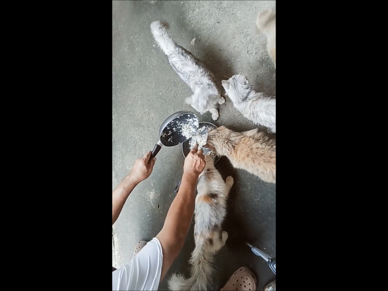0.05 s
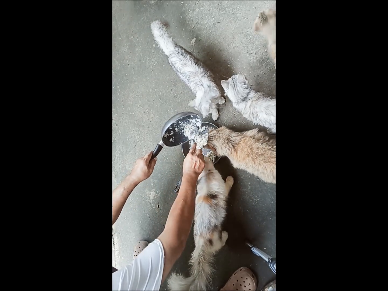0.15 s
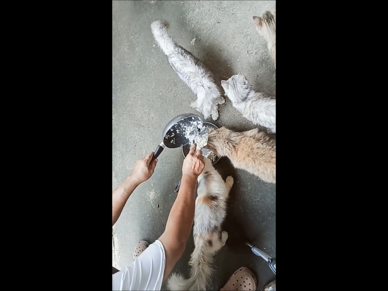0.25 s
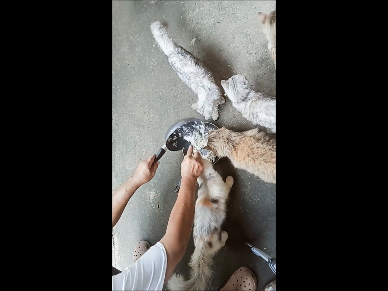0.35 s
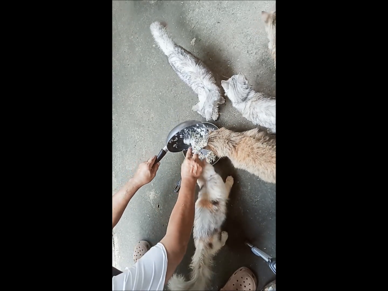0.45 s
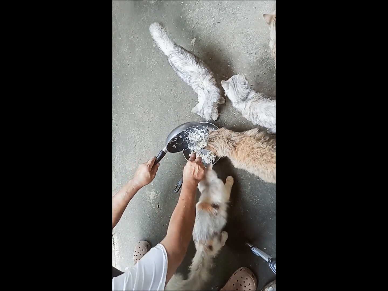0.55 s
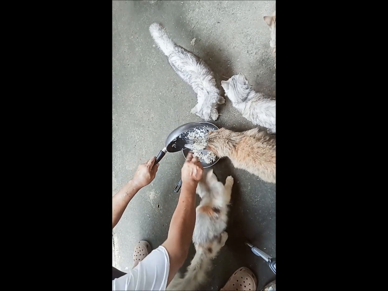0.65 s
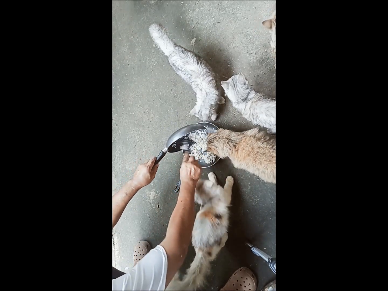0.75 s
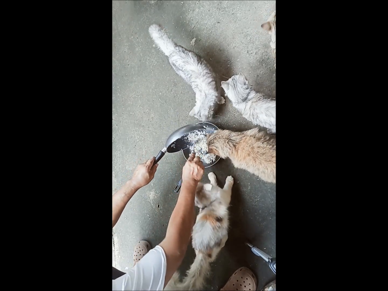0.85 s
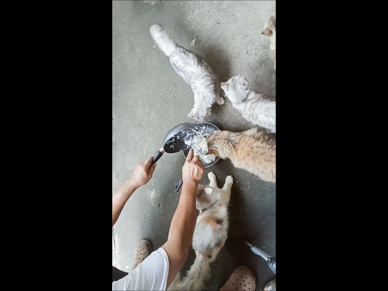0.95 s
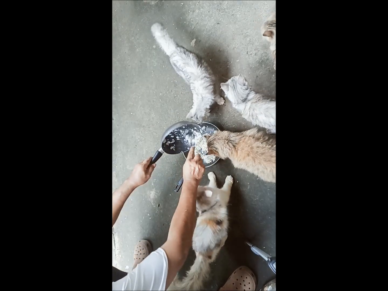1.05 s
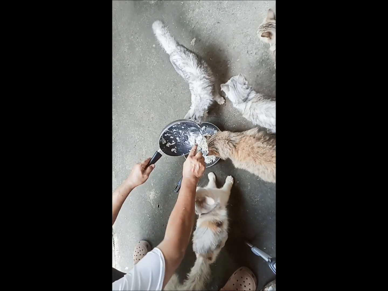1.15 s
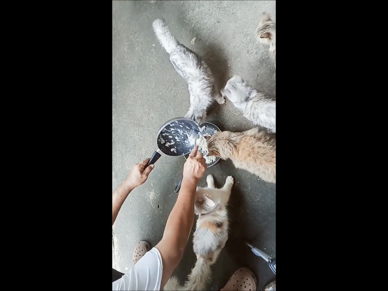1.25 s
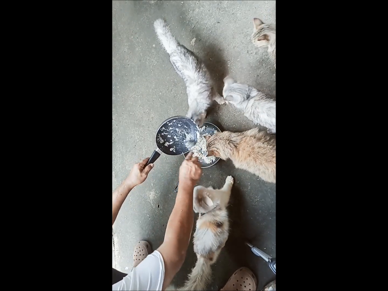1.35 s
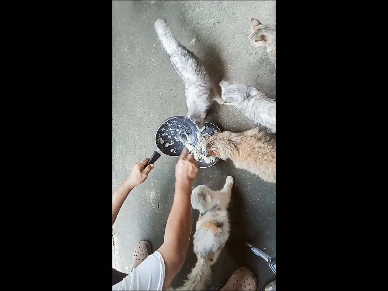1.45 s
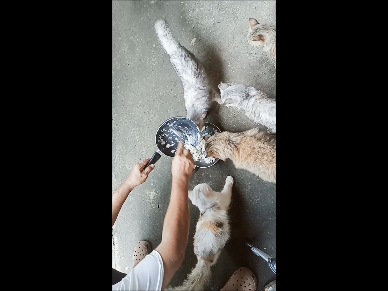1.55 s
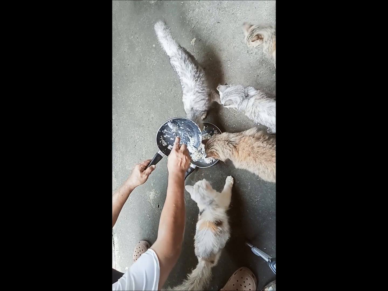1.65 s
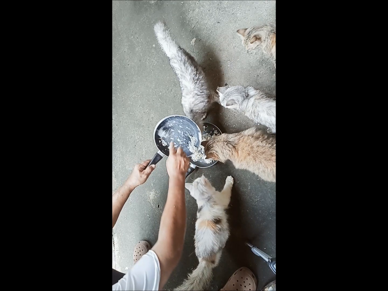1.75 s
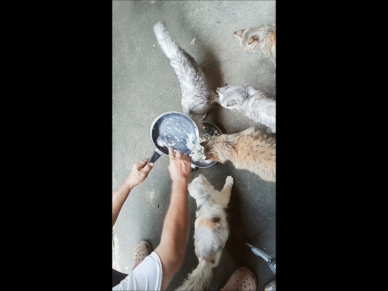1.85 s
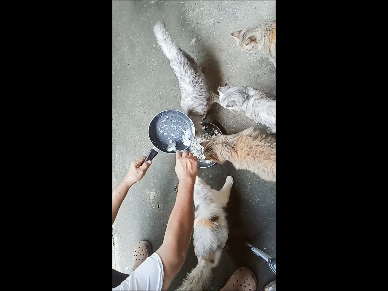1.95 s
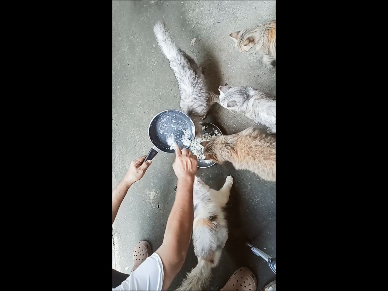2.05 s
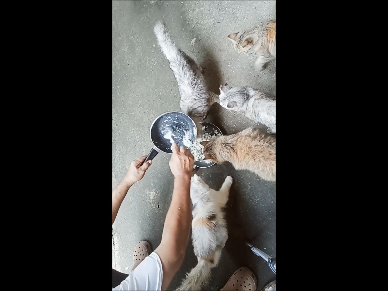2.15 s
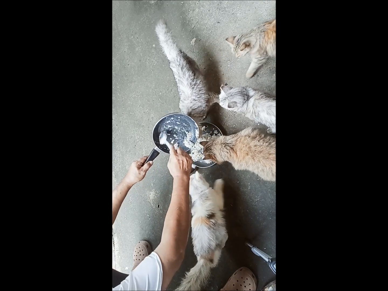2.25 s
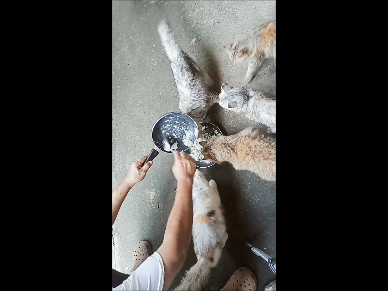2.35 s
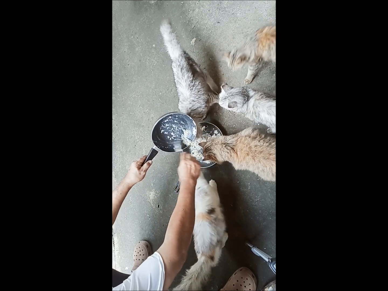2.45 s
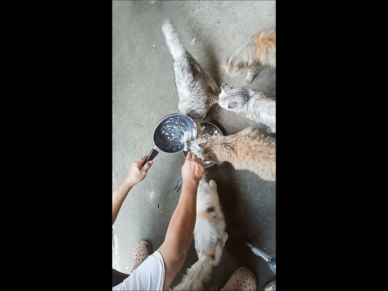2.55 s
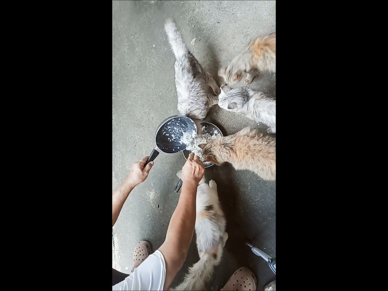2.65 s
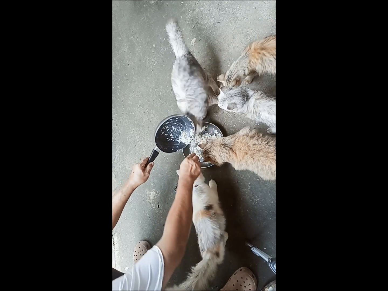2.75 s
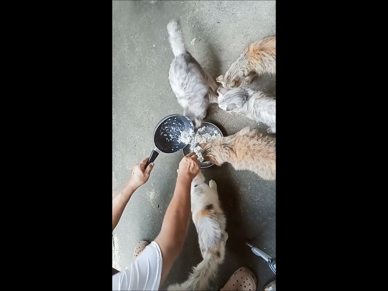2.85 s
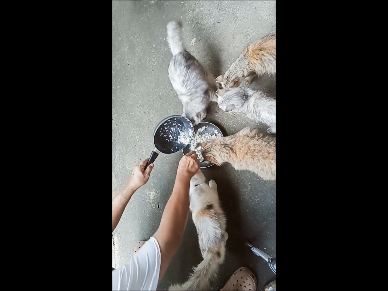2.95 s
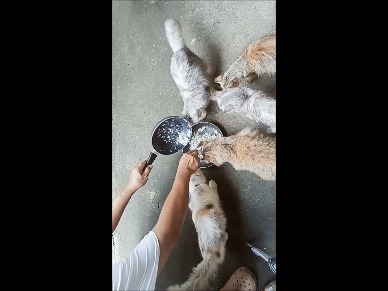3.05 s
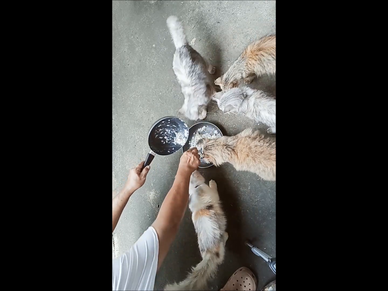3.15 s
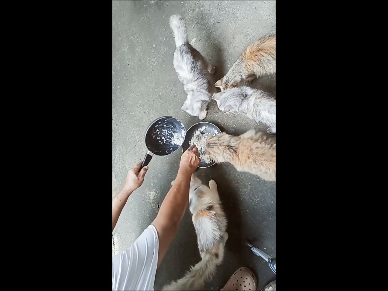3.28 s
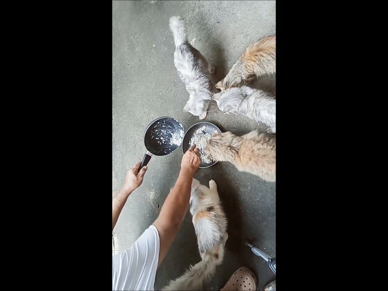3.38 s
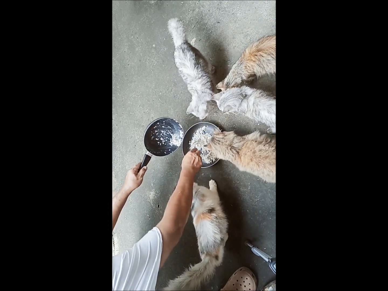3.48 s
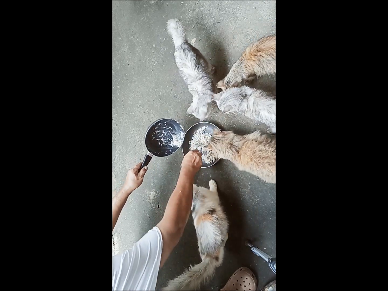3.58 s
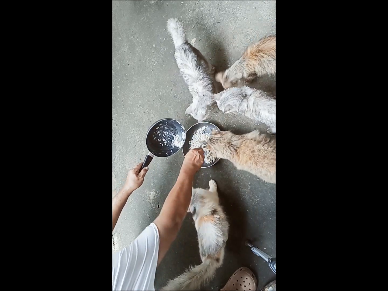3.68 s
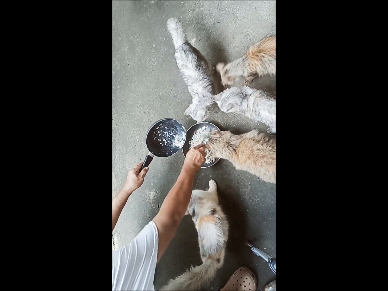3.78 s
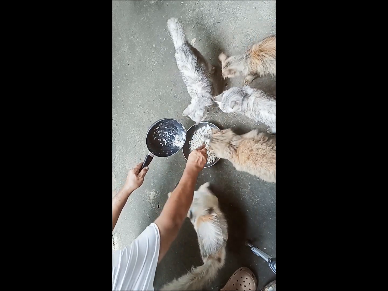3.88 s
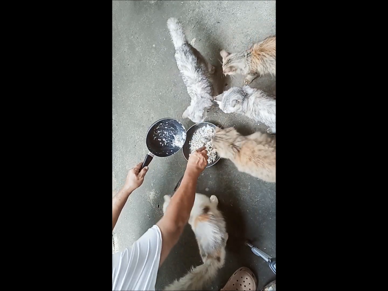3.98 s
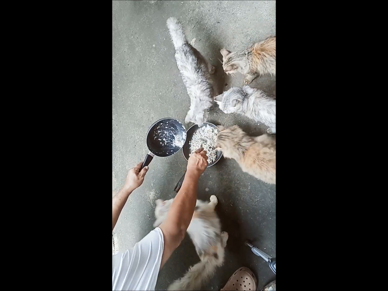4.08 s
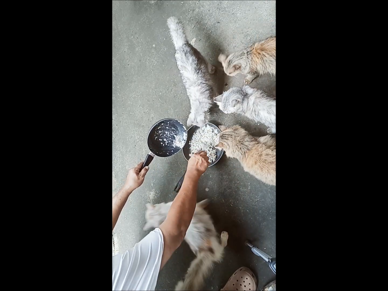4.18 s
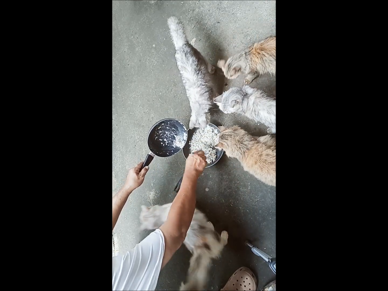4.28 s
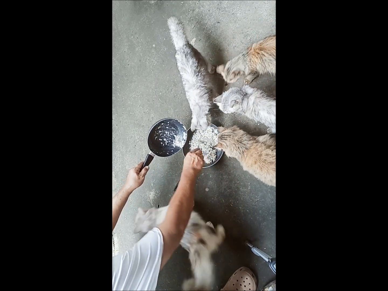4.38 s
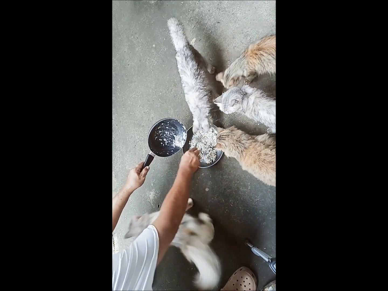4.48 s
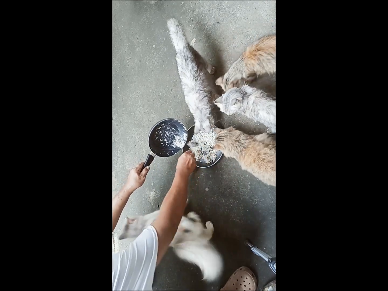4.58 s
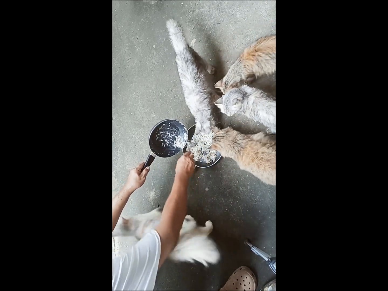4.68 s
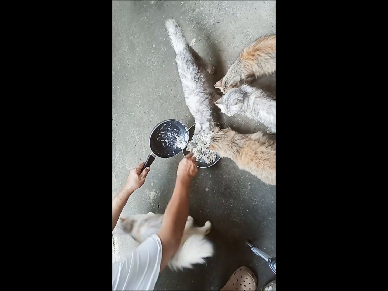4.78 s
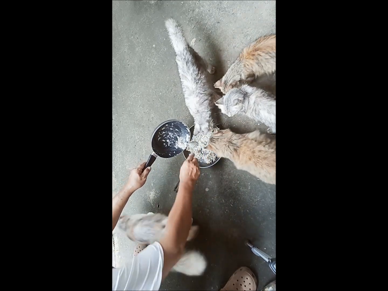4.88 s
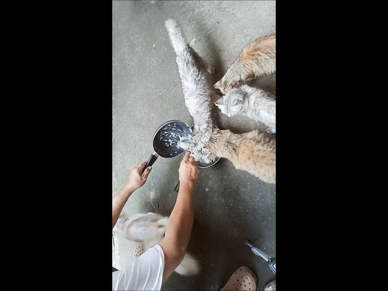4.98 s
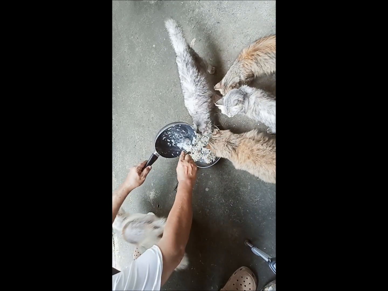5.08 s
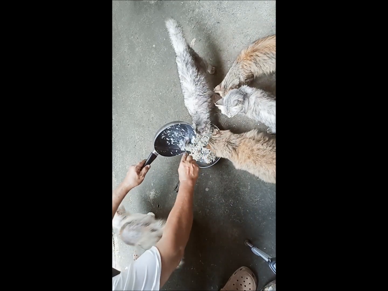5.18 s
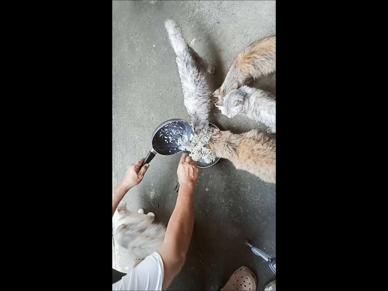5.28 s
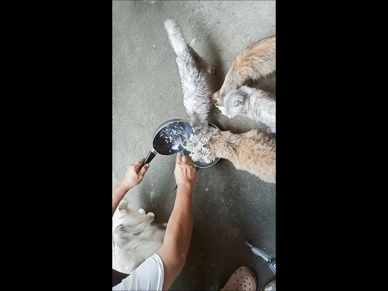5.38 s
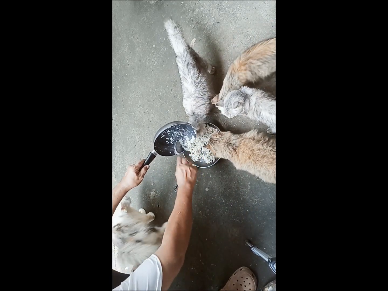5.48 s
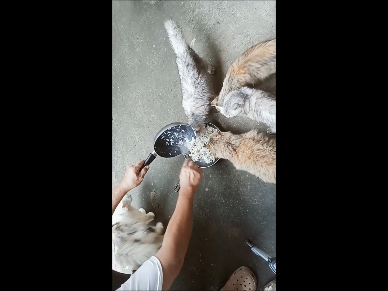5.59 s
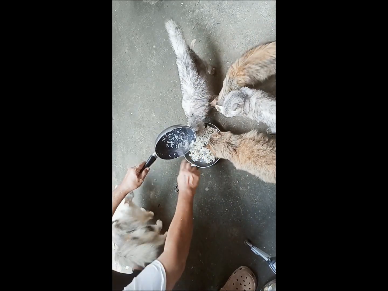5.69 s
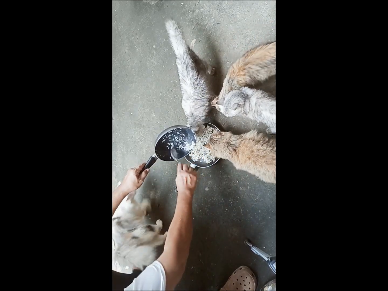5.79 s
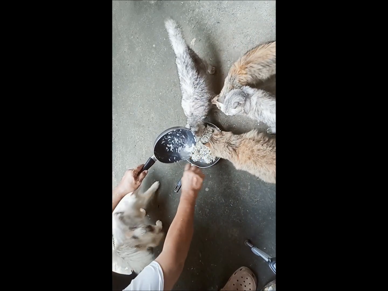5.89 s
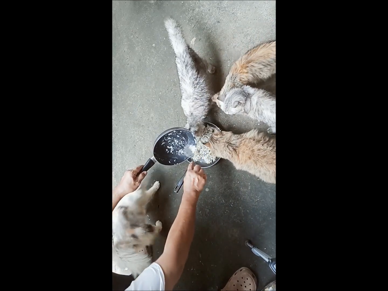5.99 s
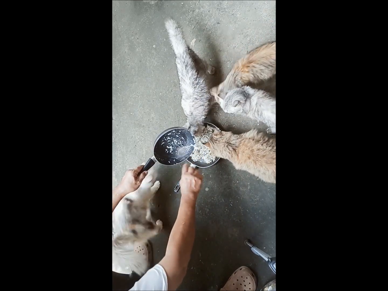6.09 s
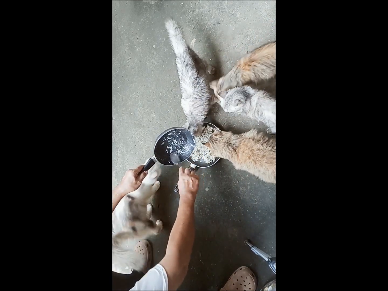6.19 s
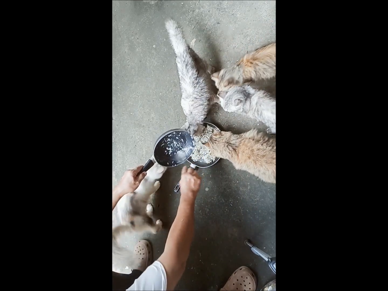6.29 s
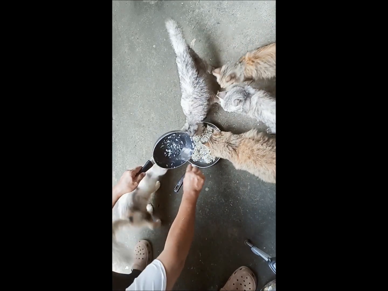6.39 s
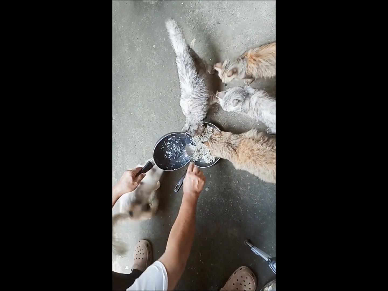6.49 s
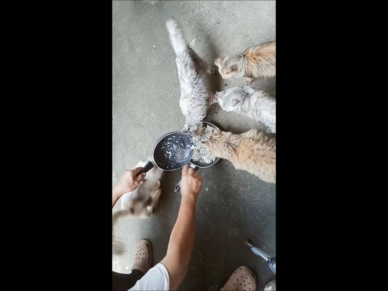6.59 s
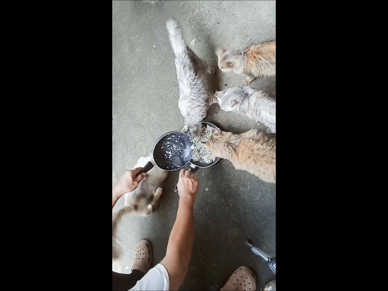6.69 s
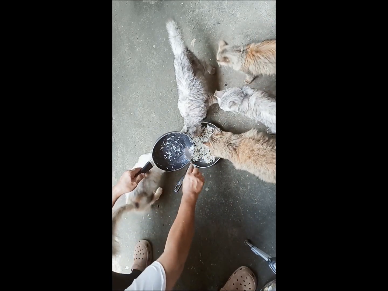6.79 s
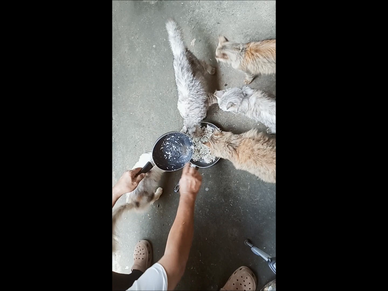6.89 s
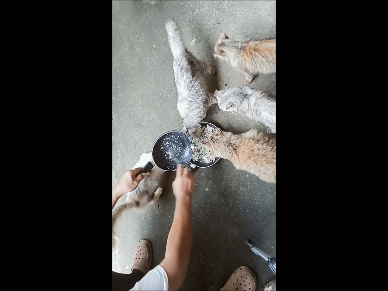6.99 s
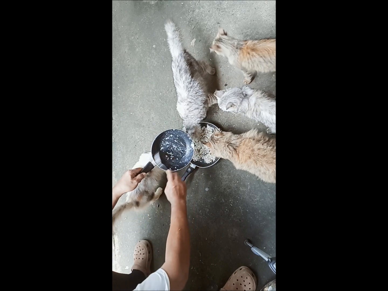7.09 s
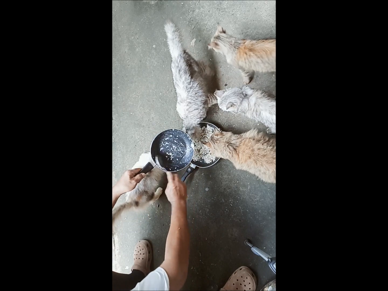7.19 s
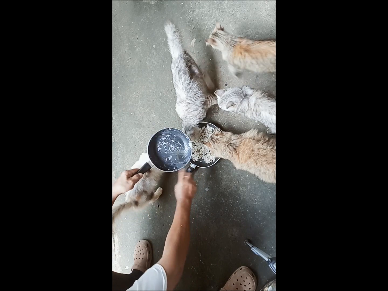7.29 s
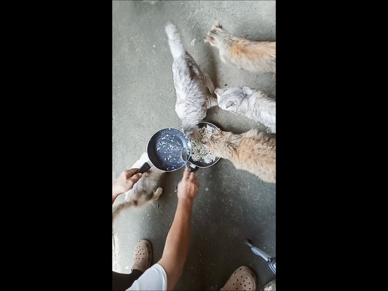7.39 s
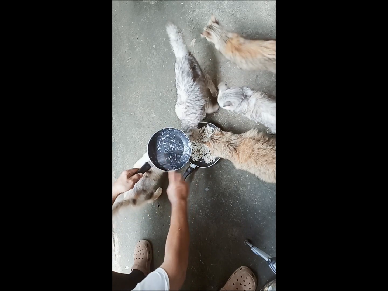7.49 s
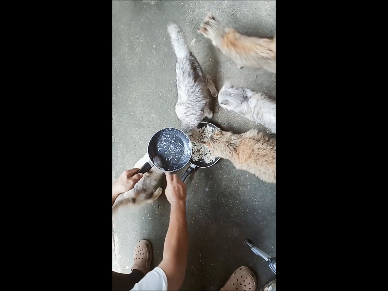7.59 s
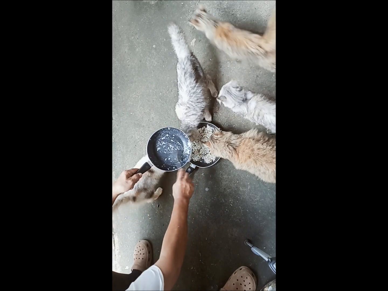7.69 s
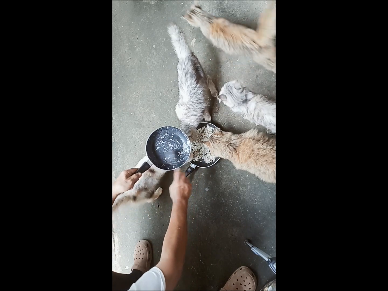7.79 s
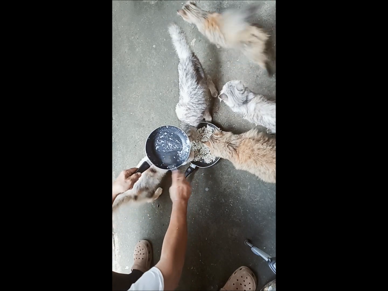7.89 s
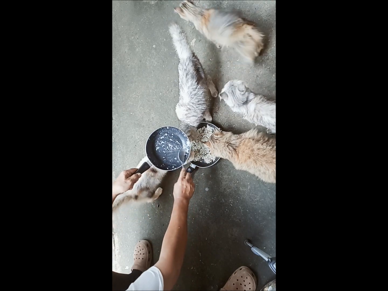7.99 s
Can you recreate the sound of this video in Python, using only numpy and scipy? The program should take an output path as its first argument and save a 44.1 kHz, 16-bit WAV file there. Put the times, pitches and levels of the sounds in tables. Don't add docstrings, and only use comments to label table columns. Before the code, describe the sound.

Close outdoors on concrete, a metal spoon knocks and scrapes a frying pan held over a metal dish. Dull, food-damped clanks come in the first two and a half seconds, with hissing, squeaky drags. Then a quiet gap with faint traffic rumble, distant engine and tiny ticks. From just before five seconds the blows return, harder and closer together, ending on the loudest clank.

```python
import sys
import numpy as np
from scipy import signal
from scipy.fft import rfft, irfft, next_fast_len
from scipy.io import wavfile
from scipy.ndimage import uniform_filter1d

SR = 44100
rng = np.random.default_rng(int(sys.argv[2]) if len(sys.argv) > 2 else 0)


def file_out(sig):
    cols = np.atleast_2d(sig).T
    lim = np.clip(cols, -1, 1)
    pcm = np.round(lim * 32767).astype(np.int16)
    wavfile.write(sys.argv[1], SR, pcm)


def invert_db(level):
    return 10 ** (np.asarray(level, dtype=float) / 20)


N = 354563

# pitch in Hz, level in dB, time to fade by 60 dB in seconds.
PAN_TONES = [(566.6, -6, 0.21), (600.5, -3, 0.36), (636, -15, 0.062), (975, -34, 0.48), (1120.8, 0.5, 0.35),
             (1141, -9, 0.072), (1446, 9.5, 0.059), (1790, -5.5, 0.26), (1818, 1.5, 0.23),
             (1996, -9.5, 0.33), (2093, -1, 0.14), (2188, -4, 0.26), (2470, -9, 0.15), (2630, 2.5, 0.17),
             (2696, 3, 0.13), (3083, -7.5, 0.34), (3115, 2.5, 0.14), (3380, -8.5, 0.23), (3657, -1.5, 0.13),
             (4010, -21, 0.043), (4136, -5, 0.086), (4480, -15.5, 0.095), (4693, -15, 0.16),
             (5482, -21, 0.11), (6050, -19.5, 0.084), (6570, -28.5, 0.13), (6920, -43.5, 0.039),
             (8320, -27, 0.14), (8500, -17.5, 0.065)]
# frequency in Hz, level in dB.
GRIT_COLOUR = [(88, -93), (150, -11), (424, -4.5), (723, 2), (958, -4), (1350, -1.5), (1610, -22.5),
               (1790, -2), (3750, -10.5), (5200, -46), (6760, -48), (11400, -120)]
# frequency in Hz, level in dB.
FIZZ_COLOUR = [(2650, -35), (4500, -4.5), (4740, -7.5), (5070, -17.5), (5370, -15), (6930, -12.5),
               (7450, -8.5), (10300, -27.5), (15600, -30.5)]
BOWL_REST_HZ = 592


def read(points, hz):
    f, value = np.transpose(points)
    return np.interp(np.log(hz + 1), np.log(f + 1), value)


def evened(x):
    return x / np.sqrt(np.mean(x ** 2) + 1e-20)


def add(mix, s, sound):
    part = mix[max(round(s * SR), 0):][:len(sound)]
    part += sound[:len(part)]


def colour(x, points, lo_hz=0, hi_hz=30000, lumps_db=0):
    size = next_fast_len(len(x), True)
    hz = np.fft.rfftfreq(size, 1 / SR) + 1
    edges = 1 / np.sqrt((1 + (lo_hz / hz) ** 6) * (1 + (hz / hi_hz) ** 6))
    lumps = np.interp(hz, np.linspace(0, SR / 2, num=180), rng.standard_normal(size=180))
    gain = invert_db(read(points, hz) + lumps_db * lumps) * edges
    return evened(irfft(rfft(x, size) * gain, size)[:len(x)])


def resonate(x, hz, width):
    turn = np.exp(2j * np.pi * np.cumsum(hz * np.ones(len(x))) / SR)
    r = np.exp(-np.pi * width / SR)
    smooth = signal.lfilter([(1 - r) ** 2], [1, -2 * r, r * r], x / turn)
    return 2 * (turn * smooth).real


def modes(t, hz, db, t60, phase):
    level = invert_db(db[:, None] - 60 * t / t60[:, None])
    return (level * np.sin(2 * np.pi * (hz[:, None] * t + phase[:, None]))).sum(0)


def landing(blow_db, bowl_hz, rim_hz, bright_db, wall_hz, bowl_db, wall_db, over_db, ring_left):
    family_hz = [620, 1150, 1950, 2850, 7000]
    family_lean = [-1.55, -0.5, 0.65, 1.36]
    rim_db, edge_db = -13, -15
    t = np.arange(SR // 4) / SR
    hz, db, t60 = np.transpose(PAN_TONES)
    chance = rng.random((3, len(PAN_TONES)))
    noise = rng.standard_normal((2, len(t)))

    tick_db = blow_db - 18.5 + 0.89 * bright_db
    family_db = blow_db + np.array([bowl_db, wall_db, rim_db, edge_db]) + bright_db * np.array(family_lean)
    family_db = np.append(family_db, tick_db + 17.5)

    spot_db = 9.9 * (chance[0] - 0.5)
    ring_db = read(np.transpose([family_hz, family_db]), hz) + db + spot_db - 14.5 - over_db / 2
    ring = modes(t, hz, ring_db, t60 * np.clip(ring_left, 0.2, 3), chance[1])
    ring *= np.clip((t[-1] - t) / 0.089, 0, 1)

    moved_wall_hz = wall_hz + 0.4 * (bowl_hz - BOWL_REST_HZ)
    clank_hz = np.array([bowl_hz, moved_wall_hz, rim_hz, 1.39 * rim_hz])
    clank_t60 = np.array([0.054, 0.067, 0.054, 0.046])
    clank = modes(t, clank_hz, family_db[:4] + 0.5 + over_db / 2, clank_t60, 0.014 + 0.2 * chance[2, :4])

    crack_fade = invert_db(-60 * t / 0.14) + 3.9 * invert_db(-60 * t / 0.0095)
    crack = colour(noise[0], GRIT_COLOUR, lumps_db=5.0) * invert_db(blow_db - 17.0) * crack_fade

    patch = [(hz, db + 12 * c) for (hz, db), c in zip(FIZZ_COLOUR, chance[2, 4:])]
    tick_fade = 1.1 * invert_db(-60 * t / 0.016) + 0.34 * invert_db(-60 * t / 0.14)
    tick = colour(noise[1], patch, lumps_db=3) * invert_db(tick_db - 6.5) * tick_fade

    low_cut = signal.butter(2, 354, "high", fs=SR)
    metal = signal.lfilter(*low_cut, (ring + clank + crack) * (1 - np.exp(-t / 0.0011)))
    return metal + tick * (1 - np.exp(-t / 0.001))


def knocks(pan):
    # start in seconds, blow in dB, bowl pitch in Hz, rim pitch in Hz,
    # brightness in dB. First, landings flat into the bowl.
    clanks = [
        (0.51, -8.5, 723, 1980, -2),
        (5.182, -2.5, 650, 2160, -0.5),
        (5.549, -2.5, 659, 1957, 1),
    ]
    side_knocks = [
        (0.037, -28, 764, 2350, 2.5),
        (0.854, -5.5, 602, 2004, 3),
        (1.749, -20.5, 634, 2040, 5.5),
        (4.761, -11, 593, 2147, 4.5),
        (6.002, -12, 710, 2075, 4.5),
    ]
    rim_knocks = [
        (1.309, -5, 560, 1795, 1),
        (5.925, -5, 563, 2270, 4),
        (6.319, -7, 722, 1924, 1.5),
        (6.781, -2, 704, 1990, -0.5),
        (7.241, -2, 536, 2178, 7),
        (7.958, 0.5, 626, 2230, 0),
    ]
    glances = [
        (0.1, -29.5, 680, 1750, 5),
        (0.624, -5.5, 562, 1754, 0),
        (0.789, -32.5, 630, 1770, -2.5),
        (1.832, -33, 566, 1830, -1),
        (2.378, -2.5, 676, 1823, -0.5),
        (5.258, -10, 582, 2100, -6.5),
        (7.697, -6.5, 558, 2130, 2.5),
    ]
    bounces = [
        (5.597, -7.5, 592, 2140, -1),
        (6.836, -7.5, 575, 2060, -3),
        (7.304, -4.5, 605, 2120, 0),
        (7.43, 0.5, 559, 2146, -2),
    ]
    muffled = [
        (0.198, -11, 827, 2065, 1.5),
        (6.378, -20, 570, 2185, 2),
    ]
    peals = [
        (1.327, 0, 560, 1824, -1.5),
        (1.861, -11.5, 560, 1770, -4),
    ]
    # wall pitch in Hz, bowl level in dB, wall level in dB,
    # clank over ring in dB, share of the ring time that the food leaves.
    kinds = [
        (1271, -8, -12.5, 10.5, 1),
        (1449, -9, -12, 0, 0.66),
        (1138, -9.5, -12.5, 2.5, 1.01),
        (1129, -10, -9.5, -5, 0.72),
        (1162, -8, -21.5, -3.5, 0.81),
        (1020, -12.5, -21, 13, 0.99),
        (1140, -12, -12.5, -5, 0.94),
    ]
    for table, kind in zip((clanks, side_knocks, rim_knocks, glances, bounces, muffled, peals), kinds):
        for s, *blow in table:
            add(pan, s - 0.0006, landing(*blow, *kind))


def drag(rows, bowl_db, rise_hz=15, from_hz=2160, to_hz=2160, squeal_db=-30, sing_hz=4100, sing_db=-30):
    ring_shares = [0.64, 0.38, 0.13]
    s, press_db, speed = np.transpose(rows)
    fizz_db = -24.5 + 22 * speed
    t = np.arange(s[0], s[-1] + 0.25, 1 / SR)
    speed_now = np.interp(t, s, speed)
    fade = np.clip((t - s[0]) / 0.0045, 0, 1) * np.clip((s[-1] - t) / 0.012, 0, 1)
    press, bowl, fizz = (fade * invert_db(np.interp(t, s, press_db + db)) for db in (0, bowl_db, fizz_db))

    sizes = invert_db(2.44 * np.minimum(rng.exponential(1, len(t)), 5)) * rng.choice([-1, 1], len(t))
    slips = evened(sizes * (rng.random(len(t)) < 4000 / SR)) + 0.56 * rng.standard_normal(len(t))
    contact_db = 1.47 * evened(uniform_filter1d(rng.standard_normal(len(t)), 300))
    slips = evened(slips * invert_db(contact_db))

    out = 0.43 * press * colour(slips, GRIT_COLOUR, lo_hz=377, lumps_db=2.0)
    out += 0.58 * fizz * colour(slips, FIZZ_COLOUR, hi_hz=11800, lumps_db=5.0)

    hz, db, t60 = np.transpose(PAN_TONES)
    spot, phase = rng.random((2, len(PAN_TONES)))
    db = db + 8 * spot + 3.8 * np.log2(hz / 2400).clip(-2, 0) + 4 * np.log2(t60 / 0.15)
    parts = slice(3, 21), slice(21, 25), slice(25, None)
    for part, drive, share in zip(parts, (press, fizz, fizz), ring_shares):
        ring = modes(t[:SR // 6] - s[0], hz[part], db[part], 0.4 * t60[part], phase[part])
        out += share * signal.oaconvolve(slips * drive, ring / np.linalg.norm(ring))[:len(t)]

    out += invert_db(22 + sing_db) * resonate(slips * press, sing_hz, 84)
    out += invert_db(17.0) * resonate(slips * bowl, BOWL_REST_HZ + rise_hz * speed_now, 62)

    squeal_hz = np.interp(t, s[[0, -1]], [from_hz, to_hz])
    catch_db = 3 * evened(uniform_filter1d(rng.standard_normal(len(t)), 700))
    slow_db = 9 * (0.6554 - speed_now)
    width_hz = 83 + 0.21 * abs(to_hz - from_hz)
    squeal_drive = slips * press * invert_db(squeal_db + catch_db + slow_db)
    return s[0], out + invert_db(21.0) * resonate(squeal_drive, squeal_hz, width_hz)


def long_drags(pan):
    # time in seconds, pressure in dB, speed from 0 to 1.
    drag_curves = [
        [(.87, -26.5, 0.4), (.91, -27.5, 0.78), (.94, -32.5, 0.65), (1.02, -71, 0.7)],
        [(1.345, -21.5, 0.2), (1.41, -33.5, 0.3), (1.49, -34.5, 0.06), (1.55, -93, .1)],
        [(1.82, -43, 0.77), (1.87, -25.5, 0.3), (1.95, -25.5, 0.59), (2.0, -24.5, 0.62), (2.04, -37, 0.77),
         (2.13, -66, 0)],
        [(2.4, -33, 0.02), (2.43, -39, 0), (2.49, -26, 0.6), (2.555, -30.5, 0.71), (2.59, -28.5, 0.8),
         (2.625, -42, 0.05), (2.71, -78, .2)],
        [(6.345, -60, 0.2), (6.385, -40, .48), (6.43, -35.5, 0.4), (6.49, -43.5, 0.43), (6.58, -59.5, 0.6)],
        [(7.31, -28.5, 0.3), (7.345, -26, 0.1), (7.375, -18, 0.94), (7.41, -25, 0.62), (7.435, -56, 1)],
        [(7.71, -28, 0.32), (7.79, -24.5, 0.9), (7.825, -30, 0.5), (7.88, -48, 0), (7.94, -84, .05)],
        [(.525, -31, .2), (.56, -41, 0.28), (.61, -53, 0.1)],
    ]
    # bowl tone in dB, bowl pitch rise at full speed in Hz,
    # squeal start in Hz, squeal end in Hz, squeal level in dB.
    paths = [(4, 8.6, 2680, 2850, -3), (-17, 28, 2400, 1800, -27), (-8, 27, 1730, 1880, -6),
             (-9, 262, 1810, 1800, -0.5), (6, 17, 2850, 1890, -5), (3, 165, 3750, 3450, -11),
             (2, 155, 2900, 2570, -10), (15, 780, 2010, 2100, -15)]
    # pitch in Hz, level in dB.
    singing_tones = [(4360, -20), (4215, -21), (4110, -14), (4070, -11.5), (4030, -20), (4525, -11),
                     (2095, -2), (2800, -20)]
    for rows, path, singing in zip(drag_curves, paths, singing_tones):
        add(pan, *drag(rows, *path, *singing))


def slide(start, length, press_db, bowl_db, speed):
    u = np.linspace(0, 1, num=6)
    eased_db = press_db - 33.5 * u ** 1.67
    return drag(np.transpose([start + length * u, eased_db, speed + 0 * u]), bowl_db)


def short_slides(pan):
    # start in seconds, length in seconds, pressure in dB, bowl tone in dB, speed from 0 to 1.
    slides = [(0.0, 0.13, -39.5, -29, 0), (0.774, 0.075, -49, -12, .05), (1.754, 0.075, -38, 5.5, 0.6),
              (4.776, 0.037, -31.5, 9, 0.3), (5.273, 0.17, -34, 4, .02), (5.603, 0.18, -26.5, 0, 0.41),
              (6.008, 0.13, -26.5, 0, 0.41), (6.843, 0.18, -28, -13, 0.56), (7.446, 0.081, -35, -8, 1),
              (7.97, 0.098, -12.5, 2.5, .3)]
    for row in slides:
        add(pan, *slide(*row))


def bump(db):
    t = np.arange(SR // 20) / SR
    swing = 70 * t + 0.89 * (1 - np.exp(-t / 0.0018))
    push = invert_db(db) * np.sin(2 * np.pi * swing) * invert_db(-60 * t / 0.026)
    return push * (1 - np.exp(-t / 0.00058))


def floor_bumps(pan):
    # start in seconds, level in dB.
    bumps = [(0.198, -29), (0.852, -26.5), (1.303, -39), (2.378, -24), (5.179, -21), (5.259, -29),
             (5.596, -29), (5.923, -27), (6, -30), (6.835, -43), (7.238, -12.5), (7.428, -20.5),
             (7.957, -42)]
    for s, db in bumps:
        add(pan, s + 0.0011, bump(db))


def walls(x):
    taps = np.zeros(SR // 2)
    at = np.arange(120, len(taps) - 20, 20)
    taps[at + rng.integers(0, 20, len(at))] = rng.choice([-1., 1.], len(at))
    hz, t, z = signal.stft(taps, SR, nperseg=256)
    t60 = read([(300, 0.35), (2000, 0.28), (8000, 0.28)], hz)
    tail = signal.istft(z * invert_db(-60 * t / t60[:, None]), SR, nperseg=256)[1]
    return signal.oaconvolve(x, tail / np.linalg.norm(tail))[:N]


def yard():
    # frequency in Hz, level in dB per Hz.
    air_colour = [(15, -45), (25, -10), (120, 1.5), (190, -1), (427, -6), (591, -6), (1230, -12.5),
                  (3340, -21), (3820, -22), (5430, -44), (7920, -43.5), (9840, -55.5), (14800, -53),
                  (16000, -63)]
    # time in seconds, rumble in dB.
    traffic = [(0.0, -74), (1.36, -62), (1.43, -68), (3.8, -58), (3.96, -75), (4.66, -75), (5.06, -70),
               (5.33, -86), (5.73, -64), (6.85, -75), (8.04, -73)]
    # time in seconds, pitch in Hz, level in dB.
    engine = [
        (2.7, 106.5, -70),
        (2.886, 117.8, -48),
        (3.14, 119, -54),
        (3.528, 112.2, -46),
        (3.9, 111.6, -66),
    ]
    # start in seconds, level in dB, pitch in Hz.
    specks = [
        (3.2446, -47, 3920),
        (3.6361, -47, 3100),
        (3.7745, -45, 3680),
        (4.1194, -58, 3380),
        (4.5371, -43, 3230),
    ]
    t = np.arange(N) / SR

    a, b, patches = rng.standard_normal((N // 256 + 5, 513, 3)).T
    patches = evened(uniform_filter1d(uniform_filter1d(patches, 10, 0), 16, 1))
    noise = signal.istft((a + 1j * b) * invert_db(2.33 * patches), nperseg=1024, noverlap=768)[1][:N]

    out = invert_db(-53.0) * colour(noise, air_colour, lo_hz=81, hi_hz=2800)
    stir_db = evened(uniform_filter1d(rng.standard_normal(N), 900))
    out += invert_db(-63.5 + stir_db) * colour(noise, air_colour, lo_hz=2920)

    s, rumble_db = np.transpose(traffic)
    rumble = evened(resonate(colour(noise, air_colour, hi_hz=90), 68, 22))
    out += invert_db(np.interp(t, s, rumble_db)) * rumble

    s, hz, db = np.transpose(engine)
    engine_level = np.sqrt(2) * invert_db(np.interp(t, s, db, -120, -120))
    out += engine_level * np.sin(2 * np.pi * np.cumsum(np.interp(t, s, hz)) / SR)

    short = np.arange(1500) / SR
    for s, db, hz in specks:
        grain = evened(resonate(rng.standard_normal(len(short)), hz, 730))
        add(out, s, 0.44 * invert_db(db - 60 * short / 0.068) * grain)
    return out


def scene():
    pan = np.zeros(N)
    long_drags(pan)
    short_slides(pan)
    knocks(pan)
    floor_bumps(pan)
    return (pan + invert_db(-12.0) * walls(pan) + yard())[None]


def low_pass(x):
    return signal.sosfilt(signal.butter(12, 16510, fs=SR, output="sos"), x)


def record(dry):
    edge_hz, overload = 15550, 1.4
    heard = signal.oaconvolve(dry, signal.firwin(255, edge_hz, fs=SR)[None], "same")
    return low_pass(overload * np.tanh(heard / overload))


dry = scene()
out = record(dry)
file_out(out)
```